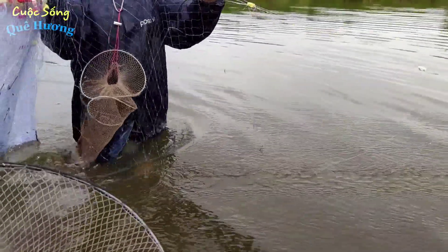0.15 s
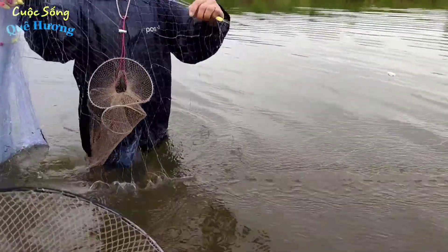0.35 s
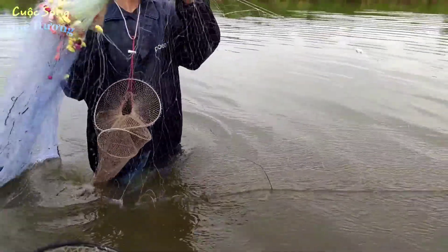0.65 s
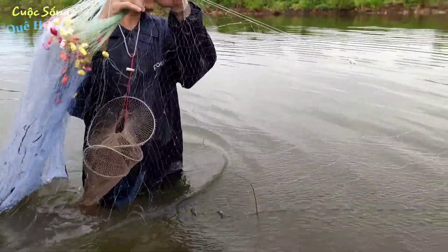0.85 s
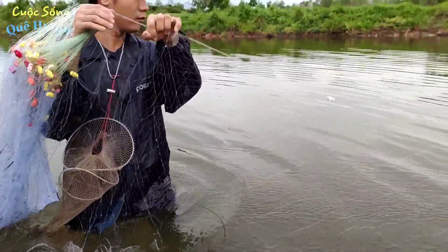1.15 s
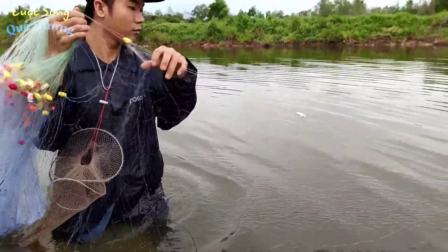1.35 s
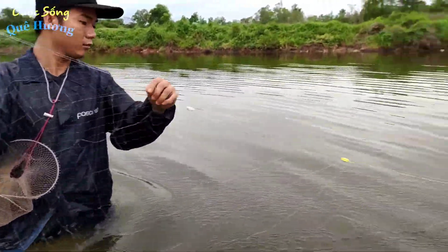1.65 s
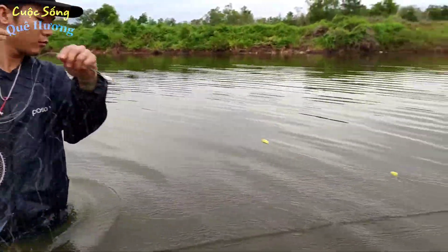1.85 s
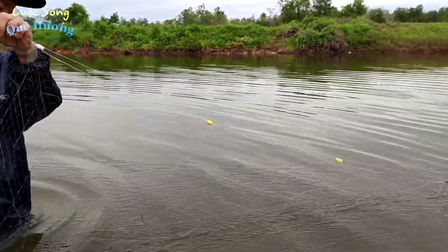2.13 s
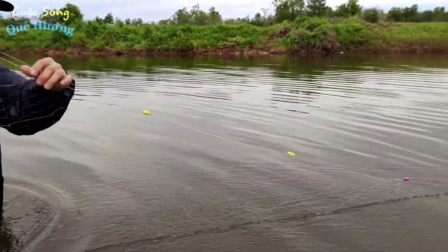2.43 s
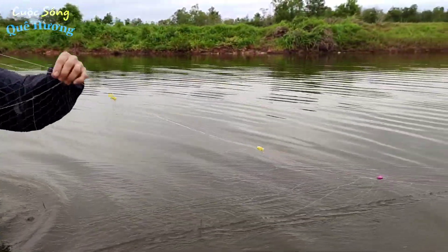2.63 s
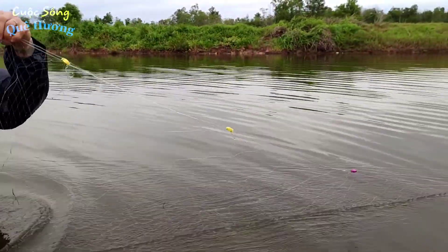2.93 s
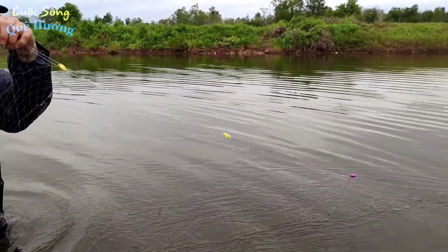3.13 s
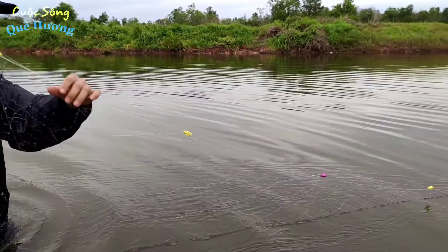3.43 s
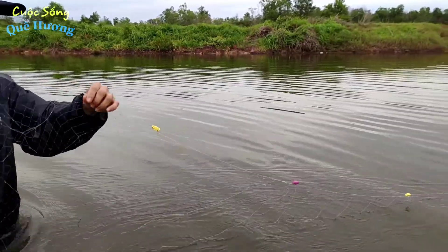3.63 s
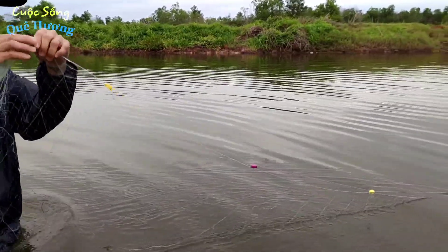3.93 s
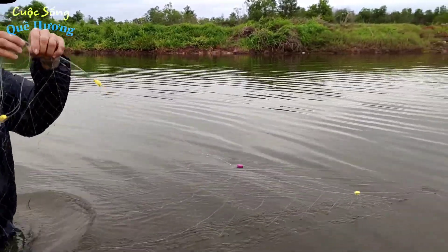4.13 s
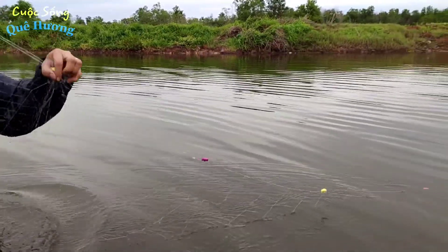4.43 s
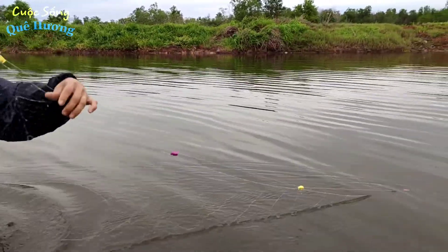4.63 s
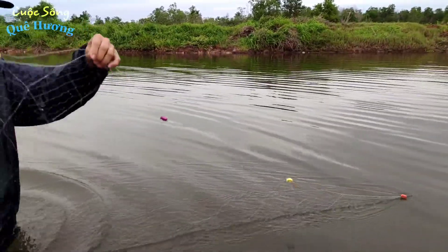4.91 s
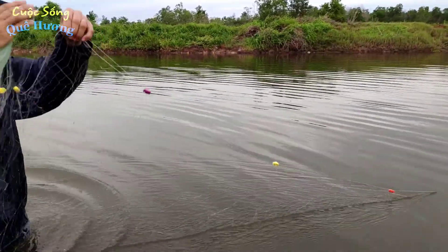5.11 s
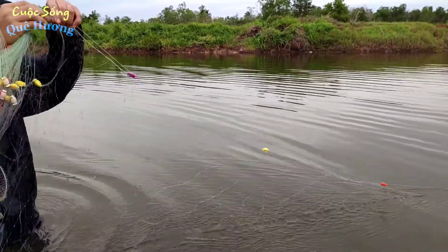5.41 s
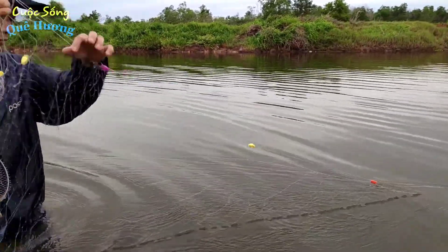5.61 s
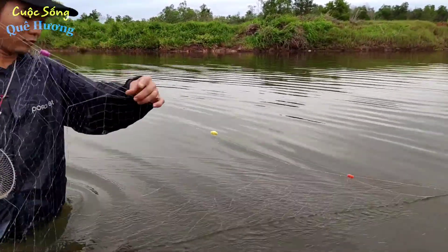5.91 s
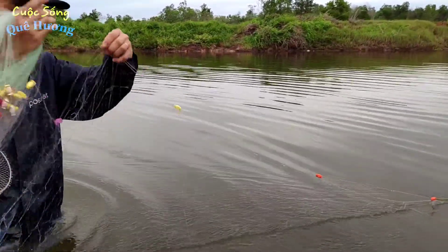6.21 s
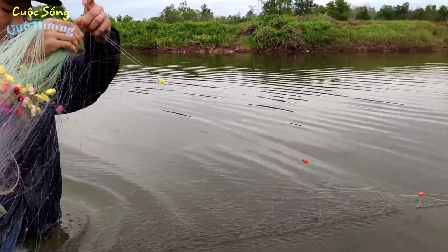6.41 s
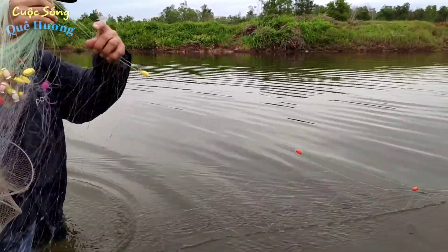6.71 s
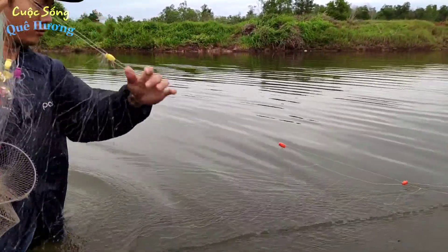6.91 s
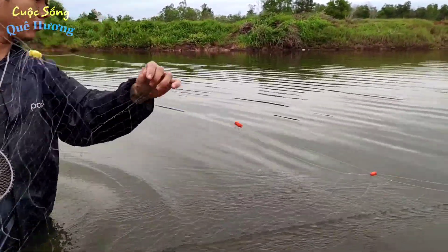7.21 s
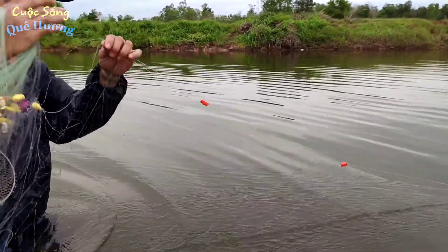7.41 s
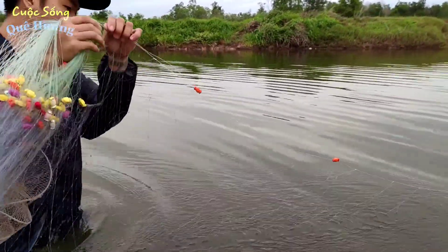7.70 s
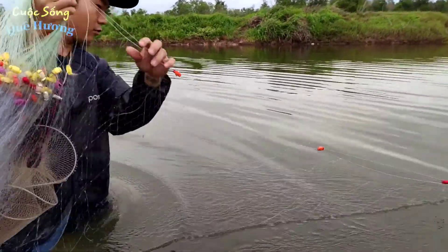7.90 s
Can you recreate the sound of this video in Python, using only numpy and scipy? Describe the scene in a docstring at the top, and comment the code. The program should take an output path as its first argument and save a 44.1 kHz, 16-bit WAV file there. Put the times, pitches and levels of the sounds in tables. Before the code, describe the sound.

Close by, drops plop irregularly onto a pond as someone wading gathers a wet fishing net by hand. Water bubbles and gurgles softly around the legs and the taut mesh ticks. The dripping is busiest about three seconds in, then thins out and picks up at the end. Faint insects and a distant bird sit behind, over a steady low rumble and airy hiss. The water is slightly to the left.

```python
"""Gathering a net in a pond

Close by, someone wades in a still pond and gathers a wet fishing net by hand: drops smack the surface,
bubbles ring and gurgle round the legs, and the taut mesh ticks. On the bank two insects chirp and a far
bird whistles, over a steady low rumble and the hiss of open air. The water is nearer the left port of
the stereo microphone, and that port has a small cavity resonance."""
import sys
import numpy as np
from scipy import signal
from scipy.fft import rfft, irfft, next_fast_len
from scipy.io import wavfile
from scipy.ndimage import uniform_filter1d, map_coordinates

SR = 44100
rng = np.random.default_rng(int(sys.argv[2]) if len(sys.argv) > 2 else 0)


def inscribe(sig):
    """Save sig as 16-bit PCM at rate SR to the path in sys.argv[1].

    A 1-D sig is mono; a 2-D sig holds one channel per row.
    Samples are clipped to [-1, 1] before scaling.
    """
    pcm = np.round(np.clip(np.atleast_2d(sig).T, -1, 1) * 32767)
    wavfile.write(sys.argv[1], SR, pcm.astype(np.int16))


N = 355049

# Drops off the net: (time [s], pitch [Hz], level [dB], upper mode relative to that level [dB])
DROPS = [(.355, 5160, -39, -30), (.518, 2130, -36, -30), (.537, 2270, -30, -30), (.582, 1680, -24, -9),
         (.651, 2250, -28, -30), (.704, 1680, -24.5, -30), (.732, 845, -17.5, -8), (0.977, 3360, -29, -30),
         (1.157, 1820, -36, -1.5), (1.192, 1400, -29.5, -30), (1.204, 1380, -31, -5),
         (1.925, 2550, -32.5, -32), (2.33, 1290, -41, -8), (2.424, 1840, -32, -30),
         (2.465, 1480, -20.5, -32), (2.492, 747, -24, -15), (2.807, 1870, -26.5, -32),
         (2.835, 2250, -21, -30), (2.854, 690, -22.5, -20), (2.863, 1670, -28, -6), (2.909, 3000, -33, -30),
         (2.954, 4300, -33, -30), (2.988, 990, -16, -5), (3.08, 1960, -23.5, -30), (3.104, 4350, -36, -30),
         (3.135, 950, -11.5, -7.5), (3.137, 2570, -21.5, -14), (3.195, 2950, -28, -30),
         (3.3, 3880, -24, -30), (3.356, 2660, -23, -30), (3.385, 2020, -32, -11), (3.402, 2030, -21, -6),
         (3.504, 1410, -19, -14), (3.631, 1770, -35, -30), (4.077, 1730, -36.5, -30),
         (4.16, 1730, -31.5, -30), (4.419, 1520, -19, -19), (5.214, 1880, -28.5, -30),
         (5.354, 1535, -20, -2.5), (5.421, 2460, -30.5, -30), (5.607, 1290, -30.5, -30),
         (5.918, 1230, -33.5, -4), (5.983, 2390, -19, -37), (5.989, 1310, -28.5, -30),
         (6.01, 920, -30, -30), (6.037, 2080, -31.5, -30), (6.283, 1750, -30, -34), (6.416, 2590, -33, -30),
         (6.432, 3970, -35, -30), (6.459, 3850, -38, -30), (6.48, 3330, -38, -30), (6.638, 1180, -28, -30),
         (6.66, 3090, -26, -30), (6.983, 1800, -31.5, -30), (7.013, 1160, -35.5, -30),
         (7.028, 2040, -35, -32), (7.186, 1110, -37, -30), (7.754, 2600, -29, -30), (7.807, 2200, -30, -30),
         (7.817, 3410, -29, -9), (7.972, 5280, -28, -30), (7.983, 2700, -31, -30), (8.007, 2000, -25, -30),
         (8.026, 1310, -32, -6)]
# Ringing bubbles: (time [s], pitch [Hz], level [dB], t60 [ms], rise per quarter of t60 [share of pitch])
BUBBLES = [(0.463, 818, -34.5, 125, 0.093), (.64, 896, -35, 56, 0.28), (.674, 1920, -39, 185, 0),
           (0.683, 1310, -29.5, 38, 0.043), (.785, 1715, -30, 52, 0.022), (.842, 1260, -32.5, 31, .05),
           (.856, 1860, -36, 56, .06), (1.105, 860, -38, 24, 0.32), (1.815, 572, -42, 87, 0.22),
           (1.908, 1216, -41, 86, 0.4), (2.033, 1023, -36.5, 95, 0.033), (2.16, 1760, -36.5, 56, 0.13),
           (2.523, 870, -24, 29, .05), (2.565, 1017, -37, 115, 0.15), (2.893, 1016, -34, 140, .16),
           (2.936, 816, -31, 45, 1), (2.964, 367, -35, 97, .1), (3.074, 495, -25, 58, 0),
           (3.15, 403, -28.5, 110, 0.26), (3.162, 1116, -29, 58, 0.19), (3.219, 1022, -37.5, 130, 0.22),
           (3.297, 1020, -37, 47, 0.44), (3.326, 980, -35, 69, 0.58), (3.346, 1310, -35.5, 99, .33),
           (3.414, 468, -25.5, 85, 0.076), (4.147, 1067, -43, 58, .03), (4.271, 1140, -40.5, 54, 0.6),
           (4.462, 1330, -35, 32, 0.23), (4.517, 2110, -40, 46, 0.019), (4.637, 1096, -40, 29, 0.00047),
           (5.115, 985, -38, 58, .06), (5.255, 980, -38, 56, .3), (5.445, 1040, -36.5, 67, 0),
           (5.483, 532, -31.5, 210, 0), (5.536, 870, -38.5, 86, 0.68), (5.572, 662, -36.5, 113, 0.28),
           (5.772, 836, -38, 97, 0.023), (5.79, 380, -37.5, 80, 0.18), (6.281, 1224, -35, 31, 0.016),
           (6.565, 410, -32, 140, .15), (6.591, 1165, -42, 59, .03), (7.642, 1103, -37.5, 87, 0.13),
           (7.698, 1270, -39, 37, 0.35), (7.91, 507, -25.5, 120, .54), (8.008, 496, -36, 250, 0.008)]
# Stir of the water: (time [s], relative gurgle [dB], relative spray [dB], delay at the right port [ms])
STIR = [(0, -64, -76.5, 0.22), (.45, -64, -67.5, .16), (.72, -53, -61, .15), (.95, -57, -74.5, .13),
        (1.3, -68, -88, 0.085), (1.7, -68.5, -77, 0.035), (1.95, -58.5, -69, 0.053),
        (2.2, -69, -74.5, 0.033), (2.48, -50, -59, 0.26), (2.68, -57, -66.5, 0.27),
        (2.88, -46.5, -58.5, .24), (3.15, -39.5, -60, 0.22), (3.35, -46, -60.5, .18),
        (3.52, -55, -61.5, 0.11), (3.75, -69.5, -72, 0.094), (4.4, -61.5, -66.5, 0.044),
        (5.05, -68.5, -75, .2), (5.4, -53.5, -61.5, .24), (5.95, -60.5, -72, 0.16), (6.2, -68, -76, 0.21),
        (6.62, -58.5, -64, 0.25), (6.85, -65, -75, 0.22), (7, -58, -77, 0.074), (7.2, -66, -77, .08),
        (7.7, -66, -70, .17), (8.05, -43, -64, 0.28)]
# Wash of merged bubbles: (frequency [Hz], relative level [dB])
WASH_SPECTRUM = [(300, -41), (600, -9.5), (1500, -5), (4000, -7), (10000, -14), (16000, -46)]
# Ticks of the mesh: (time [s], peak of the body [dB], added top above 10 kHz relative to the body [dB])
MESH_TICKS = [(0.3562, -35.5, -26), (0.373, -39, -26), (0.636, -35.5, -26), (0.7005, -35.5, -26),
              (0.9765, -35.5, -26), (1.2864, -45, -26), (1.609, -48, -26), (1.8708, -38, -26),
              (2.328, -32, 0), (2.437, -36, -26), (3.0068, -32, -23), (3.1354, -26, -35), (3.275, -37, -24),
              (3.3452, -30.5, -26), (3.3904, -32, -20), (3.416, -30.5, -26), (3.503, -23.5, -30),
              (4.1705, -40, -26), (4.463, -32, -26), (4.693, -38.5, -22), (5.267, -35.5, -30),
              (5.315, -39.5, -24), (5.44, -40.5, 5), (5.746, -36, -3), (5.8209, -27.5, -5),
              (5.8634, -40.5, -24), (6.132, -37.5, -30), (6.4164, -40, -26), (6.645, -39, -23),
              (6.659, -36, -24), (7.662, -41, -26), (7.7494, -41, -24), (7.818, -36, -20),
              (7.9103, -41.5, -24), (7.9771, -33, -24), (8.023, -35, -20)]
# Body of a tick: (frequency [Hz], relative level [dB])
TICK_SPECTRUM = [(500, -11), (1500, 5), (3000, -0.5), (6000, 4), (9500, 3), (10500, -14.5)]
# Two insects off to the right: (pitch [Hz], chirp length [s], left minus right [dB])
INSECTS = [(7430, 0.3, -7), (8010, 0.21, -6.5)]
LOWER, HIGHER = 0, 1
# Their chirps: (end time [s], rms level [dB], insect [LOWER or HIGHER])
CHIRPS = [(.455, -67, LOWER), (.86, -73, LOWER), (1.278, -67, LOWER), (1.6, -71, LOWER), (1.98, -75, LOWER),
          (2.35, -72, LOWER), (4.06, -65, LOWER), (4.43, -62, LOWER), (4.849, -70, LOWER),
          (6.253, -73, LOWER), (6.572, -73, LOWER), (6.93, -69.5, LOWER), (7.3, -73, LOWER),
          (7.715, -72, LOWER), (8.054, -73, LOWER), (.388, -64, HIGHER), (.72, -67, HIGHER),
          (.894, -70, HIGHER), (1.202, -71.5, HIGHER), (1.504, -76, HIGHER), (1.86, -76, HIGHER),
          (2.633, -65.5, HIGHER), (2.96, -69, HIGHER), (3.26, -67, HIGHER), (5.131, -65.5, HIGHER),
          (5.424, -65.5, HIGHER), (5.805, -64.5, HIGHER), (6.924, -73, HIGHER), (7.235, -73, HIGHER)]
# The far bird: (time [s], length [s], first pitch [Hz], last pitch [Hz], peak level [dB])
WHISTLES = [(1.4, 0.037, 3600, 4400, -65), (1.61, .06, 3240, 5020, -70), (1.72, 0.044, 5100, 4300, -66),
            (5.927, .035, 3600, 2500, -63), (6.07, 0.071, 2750, 3530, -61), (6.288, .03, 3500, 2600, -67),
            (6.35, 0.038, 3000, 2600, -65)]
# Low rumble of the place: (frequency [Hz], relative level [dB])
RUMBLE_SPECTRUM = [(12, -34), (20, -2.5), (45, 2.5), (90, -3), (151, -3), (222, -6.5), (250, -9),
                   (350, -18.5), (445, -23.5), (500, -32), (800, -40), (1300, -120)]
# How alike the rumble is at the two ports: (frequency [Hz], correlation [ratio])
RUMBLE_LIKENESS = [(60, 0.93), (130, 0.99), (290, 0.93), (600, 0.18)]
# Hiss of open air: (frequency [Hz], relative level [dB])
AIR_SPECTRUM = [(200, -19), (500, -1.5), (1000, -4.5), (2000, -8.5), (3000, -6), (5000, -13), (7000, -12.5),
                (11000, -14.5), (16000, -14.5)]


def amp(db):
    """Decibels to gain."""
    return 10 ** (np.asarray(db) / 20)


def unit(x):
    """Scales to rms 1."""
    return x / np.sqrt(np.mean(x ** 2) + 1e-20)


def along(points, hz):
    """Reads (frequency [Hz], value) points on a log frequency axis."""
    freqs, values = np.transpose(points)
    return np.interp(np.log(hz + 1), np.log(freqs + 1), values)


def filtered(x, response):
    """Applies a complex frequency response."""
    size = next_fast_len(N + 8192)
    return irfft(rfft(x, size) * response(np.fft.rfftfreq(size, 1 / SR)), size)[..., :N]


def stereo_noise(spectrum, likeness, patchy_db):
    """Noise of rms 1 with a set left-right likeness and patches of random gain in time and pitch."""
    bins = signal.stft(rng.standard_normal((2, N)), nperseg=512)[2]
    patches = uniform_filter1d(rng.standard_normal(bins.shape[1:]), size=6, axis=0)
    patches = uniform_filter1d(patches, size=12, axis=1)
    pair = signal.istft(bins * amp(patchy_db * unit(patches)), nperseg=512)[1][:, :N]
    width = lambda hz: np.arccos(np.clip(along(likeness, hz), -1, 1)) / 2
    response = lambda hz: amp(along(spectrum, hz)) * [np.cos(width(hz)), np.sin(width(hz))]
    mid, side = filtered(pair, response)
    return unit(np.array([mid + side, mid - side]))


def scatter(start, grains):
    """Sums rows of samples into one track at their start times."""
    at = np.round(start * SR).astype(int)[:, None] + np.arange(grains.shape[1])
    return np.bincount(np.clip(at, 0, N).ravel(), grains.ravel(), N + 1)[:N]


def at_microphone(start, grains):
    """The further left the water, the later and softer its sound reaches the right port."""
    times, _, _, delay_ms = np.transpose(STIR)
    jitter = rng.standard_normal((len(start), 2))
    lag_ms = np.interp(start, times, delay_ms) + 0.05 * jitter[:, 0]
    right = amp(2.0 - 23.1 * lag_ms + 1.87 * jitter[:, 1])[:, None] * grains
    return np.array([scatter(start, grains), scatter(start + lag_ms / 1000, right)])


def plops(start, hz, db, t60, rise, rough, samples):
    """Damped sines that climb in pitch as a bubble nears the surface and waver as it deforms."""
    t = np.arange(samples) / SR
    hz, db, t60, rise = [np.asarray(v)[:, None] for v in (hz, db, t60, rise)]
    climb = 1 + rise * np.minimum(4 * t / t60, 4)
    waver = rough * np.sqrt(hz / SR) * np.cumsum(rng.standard_normal((len(start), samples)), axis=1)
    phase = 2 * np.pi * np.cumsum(hz * climb, axis=1) / SR + waver
    envelope = amp(db - 60 * t / t60) * (1 - np.exp(-t * hz / 0.82))
    return at_microphone(start, envelope * np.sin(phase))


def swarm(level_db, hz, spread, cycles, spiky_db, count, samples):
    """Small bubbles at random moments, louder in clumps; level_db has one value per row of STIR."""
    moment, rarity, lift = rng.random((count, 3)).T
    pitch_draw, life_draw = rng.standard_normal((count, 2)).T
    start = moment * N / SR
    pitch = np.clip(hz * np.exp(spread * pitch_draw), 350, 15000)
    clumps_db = 2.2 * map_coordinates(rng.standard_normal(200), [start * 20])
    db = np.interp(start, np.transpose(STIR)[0], level_db) + clumps_db - spiky_db * np.log(rarity + 0.03)
    t60 = cycles * np.exp(0.5 * life_draw) / pitch
    return plops(start, pitch, db, t60, rise=0.3 * lift ** 3, rough=0.36, samples=samples)


def drops():
    """Each drop hits the pond as a short ragged splat with an upper mode; low ones last longer."""
    start, hz, db, upper_db = np.transpose(DROPS)
    upper_ratio, t60_at_1khz = 1.843, 0.0177
    start, hz, db = np.tile(start, 2), np.append(hz, upper_ratio * hz), np.append(db, db + upper_db)
    t60 = t60_at_1khz * (1000 / hz) ** 0.33
    return plops(start, hz, db, t60, rise=np.full(len(start), 0.055), rough=0.68, samples=1500)


def bubbles():
    """Single bubbles stand out of the water; the longer they last, the clearer they ring."""
    start, hz, db, t60_ms, rise = np.transpose(BUBBLES)
    return plops(start, hz, db, t60_ms / 1000, rise, rough=0.2 + 6 / t60_ms[:, None], samples=4600)


def stirred_water():
    """Gurgle round the legs, trickle and fine spray off the mesh, stray drips and fizz throughout."""
    _, gurgle_db, spray_db, _ = np.transpose(STIR)
    steady_db = np.full(len(STIR), -52)
    gurgle = swarm(gurgle_db + 5, hz=850, spread=0.458, cycles=24.6, spiky_db=2.4,
                   count=2400, samples=1100)
    trickle = swarm(spray_db + 13, hz=2342, spread=0.4455, cycles=36.5, spiky_db=4.5,
                    count=2000, samples=450)
    spray = swarm(spray_db + 16, hz=6730, spread=0.625, cycles=7.1, spiky_db=3.3, count=3500, samples=100)
    drips = swarm(steady_db, hz=3460, spread=0.5, cycles=16.2, spiky_db=4.5, count=300, samples=400)
    fizz = swarm(spray_db / 2 - 13, hz=7020, spread=0.29, cycles=16.3, spiky_db=4, count=400, samples=200)
    return gurgle + trickle + spray + drips + fizz


def wash():
    """Bubbles merge into a surging wash: its low part follows the legs, the rest the mesh."""
    times, gurgle_db, spray_db, _ = np.transpose(STIR)
    t = np.arange(N) / SR
    noise = stereo_noise(WASH_SPECTRUM, likeness=[(500, 0.8), (1500, 0.2)], patchy_db=3)
    surging = noise * amp(2.7 * map_coordinates(rng.standard_normal(100), [t * 9]))
    churn = filtered(surging, lambda hz: 1 / (1 + (hz / 1600) ** 4))
    legs, mesh = amp(np.interp(t, times, gurgle_db - 4.5)), amp(np.interp(t, times, spray_db))
    return legs * churn + mesh * (surging - churn)


def mesh_ticks():
    """The taut mesh ticks: tiny bursts of noise, each with its own amount of top end."""
    start, db, top_db = np.transpose(MESH_TICKS)
    t, hz = np.arange(512) / SR, np.fft.rfftfreq(512, 1 / SR)
    lead, t60 = 64 / SR, 0.011  # the lead leaves room for the filters to ring ahead of the tick
    envelope = (t >= lead) * amp(-60 * (t - lead) / t60)
    burst = rfft(envelope * rng.standard_normal((len(start), len(t))))
    unit_peak = lambda x: x / np.abs(x).max(axis=1, keepdims=True)
    body = unit_peak(irfft(burst * amp(along(TICK_SPECTRUM, hz))))
    top = unit_peak(irfft(burst * (hz > 10000)))
    return at_microphone(start - lead, amp(db)[:, None] * body + amp(db + top_db)[:, None] * top)


def insects():
    """On the bank, each chirp is a train of wing strokes that swells and stops short."""
    out = np.zeros((2, N + SR))
    for end, db, insect in CHIRPS:
        hz, length, pan_db = INSECTS[insect]
        start, t = end - length, np.arange(round(length * SR)) / SR
        stroke_hz = 169 * rng.normal(1, 0.02)
        strokes = (0.5 - 0.5 * np.cos(2 * np.pi * stroke_hz * t)) ** 1.4
        swell = amp(-9 * (1 - t / t[-1]) ** 2.5) * np.minimum(1, (t[-1] - t) / 0.006)
        blur = 0.118 * np.cumsum(rng.standard_normal((2, len(t))), axis=1)  # from reeds and echoes
        wing = np.sin(2 * np.pi * hz * t + blur)
        gains = amp(db + np.array([[0.5], [-0.5]]) * pan_db)
        out[:, round(start * SR):][:, :len(t)] += gains * unit(swell * strokes * wing)
    return out[:, :N]


def far_bird():
    """Faint whistles from far off, dead centre, each gliding faster toward its end."""
    out = np.zeros(N)
    for start, length, from_hz, to_hz, db in WHISTLES:
        progress = np.arange(round(length * SR)) / (length * SR)
        hz = from_hz + (to_hz - from_hz) * progress ** 1.9
        envelope = amp(db) * np.sqrt(np.sin(np.pi * progress))
        out[round(start * SR):][:len(hz)] += envelope * np.sin(2 * np.pi * np.cumsum(hz) / SR)
    return out


def background():
    """The bed of the place: a steady low rumble, near mono, and the wide, even hiss of open air."""
    rumble = stereo_noise(RUMBLE_SPECTRUM, RUMBLE_LIKENESS, patchy_db=0.28)
    air = stereo_noise(AIR_SPECTRUM, likeness=[(400, 0.085), (1200, 0.014)], patchy_db=0.4)
    return amp([[-40], [-41]]) * rumble + amp(-60) * air


def scene():
    """Water and net up close, the bank and the open air behind."""
    close = drops() + bubbles() + stirred_water() + wash() + mesh_ticks()
    return close + insects() + far_bird() + background()


def record(dry):
    """The microphone: the left port's cavity lifts a band; both sides get a band limit and DC offset."""
    cavity_hz, width_hz, limit_hz, offset = 8100, 900, 15600, -0.001
    cavity = lambda hz: 1 + amp(7) * 1j * hz * width_hz / (cavity_hz ** 2 - hz ** 2 + 1j * hz * width_hz)
    ported = np.array([filtered(dry[0], cavity), dry[1]])
    return filtered(ported, lambda hz: hz < limit_hz) + offset


dry = scene()
out = record(dry)
inscribe(out)
```